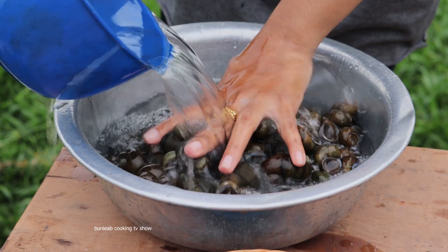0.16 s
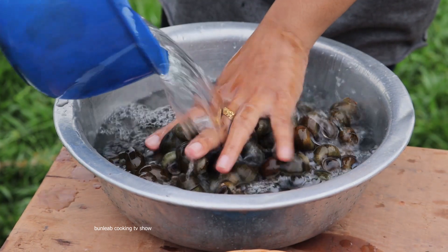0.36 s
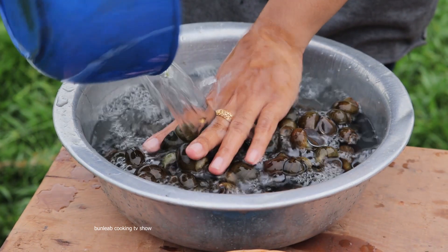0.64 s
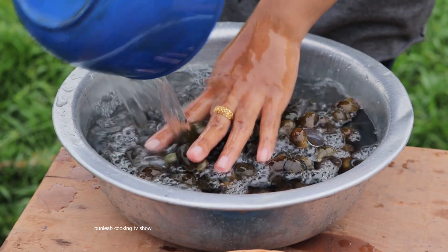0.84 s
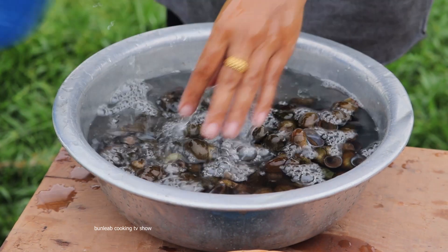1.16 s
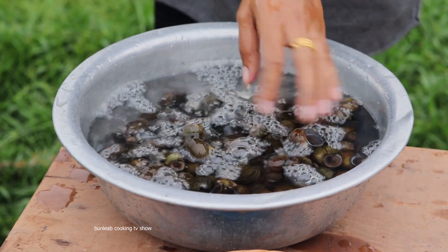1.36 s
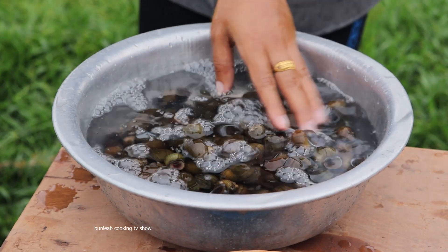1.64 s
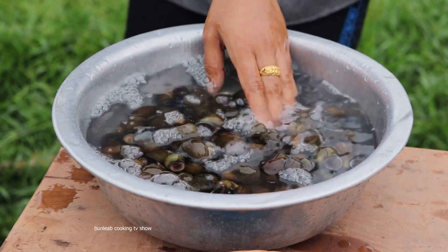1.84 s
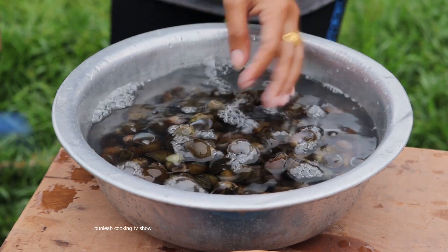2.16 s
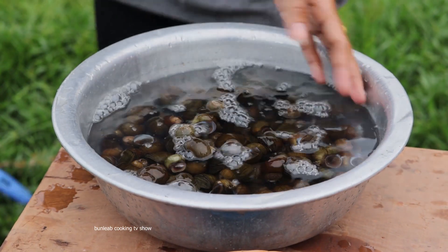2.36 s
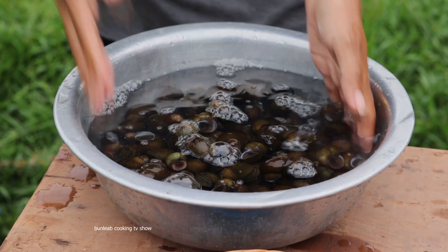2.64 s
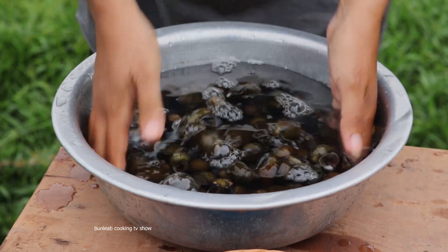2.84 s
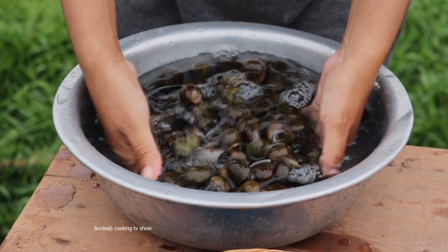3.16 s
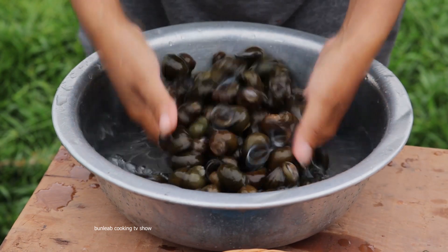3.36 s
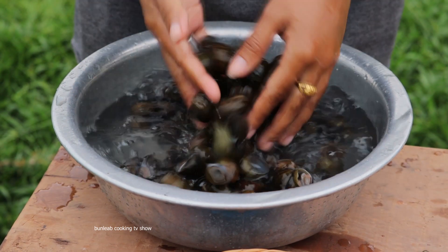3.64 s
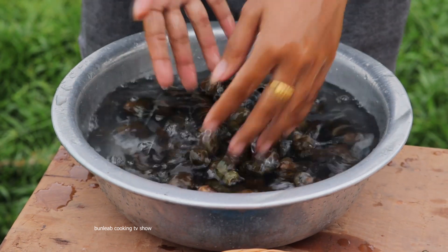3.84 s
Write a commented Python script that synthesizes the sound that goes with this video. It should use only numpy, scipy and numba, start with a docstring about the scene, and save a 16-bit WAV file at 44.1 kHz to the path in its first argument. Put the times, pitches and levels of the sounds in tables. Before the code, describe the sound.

Snail shells click and clatter quietly as water pours and gurgles into a metal basin, nearly stopping around 1.4 s. Stirring brings wet clacks and a bubble near 1.8 s, a dull basin knock at 2.3 s and faint rim rubbing. From 2.9 s to nearly 4 s, scooped shells rattle loudly and densely with bright clacks. An echoing bird repeats falling chirps until 2.7 s over faint rumble and insects.

```python
"""Throughout: distant rumble and air, and two high insect bands (shaped noise). Until about 2.7 s a bird (swept
sine) repeats a falling chirp with an echo. From the start water is poured over snails in a metal basin outdoors:
shells clatter, water gurgles and sprays (swarms of decaying sines), nearly stopping around 1.4 s. A hand stirs
them, knocks the basin at 2.3 s (damped wall modes) and rubs the rim. From about 2.9 s both hands scoop and drop
the shells, which clatter densely, with single clacks, some bright and high."""
import sys
import numpy as np
from scipy import signal
from scipy.fft import rfft, irfft
from scipy.io import wavfile
from scipy.ndimage import uniform_filter1d
from numba import njit

SR = 44100
rng = np.random.default_rng(int(sys.argv[2]) if len(sys.argv) > 2 else 0)


def int16_out(signal):
    """Quantize to a 16-bit WAV file."""
    q = np.round(np.clip(np.atleast_2d(signal).T, -1, 1) * 32767)
    wavfile.write(sys.argv[1], SR, q.astype(np.int16))


N = 176400

# Rumble and air, spectral density: f/Hz, level/dB
AIR_COLOUR = [(18, -60), (30, -16), (50, -13), (86, -2.5), (181, -5), (300, -14.5), (432, -19), (800, -20),
              (1750, -30.5), (2700, -31), (5900, -33), (8300, -28.5), (12700, -30), (15500, -42),
              (16500, -63)]
# Insect bands: centre f/Hz, Gaussian width/Hz, level/dB before flicker
INSECT_BANDS = [(11000, 540, -48), (6950, 410, -54)]
# Bird chirps: t/s, level/dB
CHIRP_TIMES = [(0.162, -34.5), (0.514, -34), (.881, -33.5), (1.23, -33.5), (1.565, -33.5), (1.927, -34),
               (2.294, -34), (2.647, -33)]
# Chirp loudness along its glide: f/Hz, level/dB
SYRINX_COLOUR = [(1950, -20), (2250, -13), (2600, -12), (2950, -4), (3300, -9), (4000, -9), (4500, -6),
                 (4950, -1), (5350, -4), (5700, -1), (6200, -8)]
# Rim modes: f/Hz, level/dB, t60/s
RIM_MODES = [(484, 0, .55), (648, -9, .25)]
# Soft low thuds: t/s, level/dB, f/Hz
LOW_THUDS = [(.97, -34, 42.3), (3.5, -38, 45)]
# Large bubbles whistling upward: t/s, level/dB, start f/Hz, decay/cycles, relative pitch rise per cycle
BIG_BUBBLES = [(1.828, -18, 1100, 130, .034), (3.645, -13, 900, 50, .035)]
# Sharp ticks: t/s, level/dB, left-right/dB
SHARP_TICKS = [(0.1433, -22, 5), (0.422, -30, -4), (0.6687, -18, 2.5), (0.7447, -24, -2), (0.821, -26.5, 2),
               (0.9968, -20, -13), (2.3719, -18.5, -18), (2.5182, -14.5, -11.5), (2.5615, -25, -10)]
# Partials of a tick: f/Hz, level/dB, t60/s
TICK_MODES = [(2130, 2.5, 0.0072), (4500, -24, 0.0022), (7600, -8, 0.0013), (11600, 17, 0.0012),
              (15200, 4, 0.003)]
# Knocks on the basin wall: t/s, level/dB, left-right/dB, loudest note f/Hz
WALL_KNOCKS = [(2.264, -16, 4.5, 1300), (2.269, -18, 4.5, 870), (2.303, -3.5, 4.5, 880),
               (2.312, -17.5, 7, 1210), (2.451, -16, 6, 826)]
# Damped basin wall modes: f/Hz, level/dB, t60/s
WALL_MODES = [(263, -10.5, 0.014), (365, 1, 0.01), (480, -7, 0.045), (588, -7.5, 0.035), (766, 5, 0.0068),
              (874, -0.5, 0.039), (1074, -9, 0.038), (1380, -1.5, 0.0084), (1500, -0.5, 0.026),
              (1980, -9, 0.019), (2500, -8, 0.017), (3100, -1.5, 0.013), (3980, -1, .006)]
# Activity in the basin, before layer gains: t/s, shell clatter level/dB, gurgle level/dB, spray level/dB
BASIN_ACTIVITY = [(0.0, -35.5, -40, -53), (0.04, -37, -42.5, -45), (0.22, -40.5, -36.5, -49.5),
                  (0.46, -36, -37.5, -47.5), (0.81, -42.5, -42, -52.5), (0.85, -43.5, -47, -59.5),
                  (0.97, -39.5, -43, -51.5), (1.05, -38, -48, -41.5), (1.21, -54.5, -42, -71),
                  (1.37, -85, -73, -73), (1.64, -41.5, -43.5, -68), (1.76, -34.5, -30, -46.5),
                  (1.8, -35.5, -35, -56), (1.92, -44, -37, -72), (2.0, -41.5, -41.5, -52),
                  (2.1, -41.5, -42.5, -63), (2.32, -55, -40.5, -69), (2.4, -46, -42, -62),
                  (2.5, -51.5, -40.5, -70), (2.6, -53, -39.5, -81), (2.7, -38.5, -35, -60),
                  (2.75, -39, -34.5, -60), (2.87, -23.5, -28.5, -43.5), (3.04, -20.5, -30.5, -38.5),
                  (3.06, -21.5, -29, -37.5), (3.22, -23.5, -29, -44), (3.31, -20, -24.5, -32),
                  (3.33, -28, -33, -51), (3.35, -26.5, -36, -34.5), (3.41, -25, -29.5, -38.5),
                  (3.52, -24, -26.5, -36), (3.54, -17.5, -27.5, -30), (3.62, -23, -33, -37),
                  (3.74, -21.5, -24, -33.5), (3.82, -22.5, -29, -31.5), (3.91, -27.5, -39.5, -43),
                  (4.0, -41, -43, -68)]
# Bursting droplets: f/Hz, level/dB
SPRAY_COLOUR = [(4000, 7), (6000, 2), (8500, 1), (12000, -7), (15500, 0)]
# Gurgling bubbles: f/Hz, level/dB
GURGLE_COLOUR = [(220, -12), (350, -12.5), (500, -3.5), (800, -6.5), (1300, -10.5), (1800, -34)]
# Bright high clacks of shells: t/s, level/dB, f/Hz, left-right/dB
HIGH_CLACKS = [(0.0174, -27, 5180, 0), (0.2967, -25, 4300, 2), (0.6097, -10, 6260, -0.5),
               (1.004, -15, 4760, 1.5), (1.041, -9, 4550, 2.5), (1.053, -11, 4400, 4),
               (1.0627, -15, 6900, 7), (1.0765, -9, 4900, 2), (1.0914, -13, 4500, 1.0),
               (1.4965, -38, 6950, 3), (1.813, -16, 4560, -0.5), (2.0922, -15.5, 4500, 1),
               (3.5384, -3, 4730, -1), (3.5843, 1, 4620, 2), (3.7117, 2, 5800, 0.5),
               (3.7814, -17, 4830, 0.5), (3.865, -5.5, 4940, 1.0)]
# Loudest shell clacks: t/s, level/dB, main ring f/Hz, left-right/dB
SHELL_CLACKS = [(0.056, -25, 2440, 0), (0.073, -24, 1310, 1.5), (0.097, -24.5, 743, 3),
                (0.112, -18, 1810, -1), (0.172, -25, 2650, 0), (0.188, -13, 1500, 6),
                (0.195, -11, 2720, -3), (0.233, -22, 760, 4), (0.276, -21, 1440, 3), (0.31, -22, 1660, 3.5),
                (0.327, -24, 713, 3), (0.531, -17, 2260, 1), (0.552, -21, 2950, -2),
                (0.583, -17.5, 1516, 4), (0.625, -13, 2520, -1), (0.635, -22, 1570, 1),
                (0.82, -19.5, 3140, 2), (0.881, -19, 2800, 0), (0.91, -15.5, 2080, -0.5),
                (0.984, -23.5, 1440, 1.5), (1, -20.5, 1590, 4), (1.025, -13.5, 2350, -2),
                (1.039, -21, 1500, 0), (1.118, -23.5, 1470, 2), (1.224, -24, 2020, -1),
                (1.579, -18.5, 2560, 2), (1.703, -24, 2500, -8), (1.721, -8, 2830, 0),
                (1.733, -12, 2950, 1), (1.769, -11, 2710, -1.0), (1.814, -16.5, 2300, 0.0),
                (1.904, -22, 2480, 1), (2.092, -21.5, 2700, 0.0), (2.125, -21.5, 2360, 1),
                (2.37, -21, 2440, 2), (2.518, -26, 2030, -11), (2.561, -26, 2350, -15),
                (2.641, -13, 2790, -2), (2.78, -14, 2580, 0), (2.802, -15.5, 2400, -1.5),
                (2.96, -5, 2530, 1), (3.03, -3.5, 2690, 1), (3.062, -2.5, 2910, 1), (3.124, -10, 2410, -7),
                (3.299, -5, 2280, -0.5), (3.351, -12, 2280, 2), (3.376, -7, 2320, -1),
                (3.45, -4, 2440, -0.5), (3.522, -14, 2720, -2), (3.537, -17, 2380, -2),
                (3.68, -3.5, 2170, 1), (3.71, -25, 2620, -8), (3.752, 1, 2440, -4), (3.773, -3.5, 2490, 2),
                (3.826, -1.5, 2620, -4), (3.838, -7, 2740, 3)]
# Partials of a clack: pitch ratio, level/dB, decay/cycles
CLACK_PARTIALS = [(0.978, 2.5, 27.7), (0.672, -2.5, 12), (1.42, -5.5, 49), (2.07, 4, 5.7), (2.3, 6, 8)]
# Hollow note of the shells: f/Hz, level/dB
HOLLOW_COLOUR = [(1900, -8), (2300, 0), (2600, -1), (2900, 0), (3300, -9)]
# Broad shell clatter: f/Hz, level/dB
SHELL_COLOUR = [(530, -16), (900, -19), (1030, -9), (1240, -11.5), (1560, -6.5), (1720, -7.5), (2360, -5.5),
                (2860, -10.5), (3530, -6.5), (4630, -16), (9000, -54), (11700, -55), (19800, -120)]
# Gain of the broad clatter, lower while shells are pushed under water: t/s, level/dB
SUNK_GAIN = [(2.6, 1), (2.8, -6), (3.25, -3.5), (3.45, 1.5)]

CLATTER, GURGLING, SPRAYING = 1, 2, 3  # columns of BASIN_ACTIVITY
AIR_MID_DB, AIR_WIDE_HZ = -43.5, 4900
INSECT_FLICKER_DB = 1.2
CHIRP_TOP_HZ, CHIRP_FLOOR_HZ, CHIRP_FALL_S = 6030, 1804, 0.039  # glide decays towards the floor
CHIRP_LEN_S, CHIRP_EDGE_S, CHIRP_ROUGH_DB, BIRD_PAN_DB = 0.092, 0.0054, 1.5, -3
TREES_T60_S, TREES_DB = 0.42, 4
ECHO_S, ECHO_DB, ECHO_TOP_HZ = 0.052, -4.5, 4200
RUB_FROM_S, RUB_TO_S, RUB_SLIP_DB = 2.37, 2.9, -42
KNOCK_FALL_DB = 3  # per octave squared from the loudest note
WALL_BUMP_DB = -6.5  # re clatter activity
CLACK_RUN_S, REBOUND_DB = 0.007, -4
SOFT_CYCLES, SPREAD_S = 0.24, 0.003  # swell of a wet contact; largest start offset of its pitches
WIDE_HZ, LEFT_LEADS_S = 14800, 2.8e-5  # random phase spread grows up to WIDE_HZ
TOP_HZ = 16100


def undb(db):
    """Amplitude gain of a dB value."""
    return 10 ** (np.asarray(db) / 20)


def colour(table, hz):
    """Level in dB at hz, interpolated over log frequency."""
    f, db = np.array(table, float).T
    return np.interp(np.log(hz), np.log(f), db)


def activity(t, column):
    """Level in dB of one basin activity column at t."""
    table = np.array(BASIN_ACTIVITY)
    return np.interp(t, table[:, 0], table[:, column])


def flutter(count, size):
    """Twice-smoothed noise of unit deviation."""
    x = uniform_filter1d(uniform_filter1d(rng.standard_normal(count), size=size), size=size)
    return x / x.std()


@njit
def ring(start, hz, fade, swell, glide, left, right, size):
    """Sum of swelling, decaying, gliding sines, cut at -40 dB, with a complex weight per channel."""
    out = np.zeros((2, size))
    for k in range(len(start)):
        i = start[k]
        z = 1. + 0j
        step = fade[k] * np.exp(2j * np.pi * hz[k] / SR)
        bend = np.exp(1j * glide[k])
        level, unswollen = 1., 1.
        while level > .01 and i < size:
            out[0, i] += (1 - unswollen) * (z * left[k]).imag
            out[1, i] += (1 - unswollen) * (z * right[k]).imag
            z = z * step
            step = step * bend
            level = level * fade[k]
            unswollen = unswollen * swell[k]
            i += 1
    return out


def grains(t, hz, cycles, db, pan_db, rise=0., soft=0.13):
    """Rings decaying 60 dB per `cycles`, swelling over `soft` cycles, rising by `rise` per cycle."""
    t, hz, cycles, db, pan_db = (np.ravel(v) * 1. for v in np.broadcast_arrays(t, hz, cycles, db, pan_db))
    hz = np.clip(hz, 20, .4 * SR)
    chance = rng.standard_normal((2, len(t)))
    turn = chance[0] * np.pi * np.minimum(hz / WIDE_HZ, 1) / 2 + np.pi * hz * LEFT_LEADS_S
    sign = np.sign(chance[1])
    w = 2 * np.pi * hz / SR
    fade = np.exp(-np.log(1000) * hz / cycles / SR)
    swell = np.exp(-hz / soft / SR)
    glide = rise * w * w / (2 * np.pi)
    left = sign * undb(db + pan_db / 2) * np.exp(1j * turn)
    right = sign * undb(db - pan_db / 2) * np.exp(-1j * turn)
    return ring((t * SR).astype(np.int64), hz, fade, swell, glide, left, right, N)


def struck(rows, modes):
    """Every blow excites the same modes, with a random balance."""
    t, db, pan = np.array(rows).T[:, :, None]
    hz, mode_db, t60 = np.array(modes).T
    balance_db = 1.5 * rng.standard_normal((len(t), len(hz)))
    return grains(t, hz, hz * t60, db + mode_db - 6 + balance_db, pan)


def swarm(column, table, cycles, scatter_db, gain_db, count, size, rise=0.):
    """Random contacts, each ringing `size` pitches; their summed level follows one activity column."""
    chance = rng.random((count, 3 + 3 * size))
    pitch, length, late = chance[:, 3::3], chance[:, 4::3], chance[:, 5::3]
    lowest, highest = table[0][0], table[-1][0]
    hz = lowest * (highest / lowest) ** pitch
    # 10 log10(hz) offsets the shorter rings of high pitches
    db = colour(table, hz) + 10 * np.log10(hz) - scatter_db * np.log(chance[:, 1:2] + 0.0039)
    t = chance[:, :1] * N / SR + SPREAD_S * late
    pan_db = 5 * (chance[:, 2:3] - .5)
    x = grains(t, hz, cycles * (.5 + length), db, pan_db, rise, SOFT_CYCLES)
    return x / np.sqrt(np.mean(x ** 2)) * undb(gain_db + activity(np.arange(N) / SR, column))


def air():
    """Rumble and air: coloured noise, narrow in the bass, wide in the treble."""
    hz = np.maximum(np.arange(N // 2 + 1) * SR / N, 10)
    mid, side = rfft(rng.standard_normal((2, N))) * undb(colour(AIR_COLOUR, hz))
    side = side * np.clip(hz / AIR_WIDE_HZ, .09, 1)
    mid_rms = np.sqrt(np.mean(irfft(mid, N) ** 2))
    return irfft(np.array([mid + side, mid - side]), N) * undb(AIR_MID_DB) / mid_rms


def insects():
    """Two Gaussian bands of noise that flicker quickly, partly shared by the channels."""
    hz = np.arange(N // 2 + 1) * SR / N
    out = np.zeros((2, N))
    for centre_hz, width_hz, db in INSECT_BANDS:
        noise = rng.standard_normal((3, N))
        band = np.exp(-.5 * ((hz - centre_hz) / width_hz) ** 2)
        hiss = irfft(rfft(0.41 * noise[0] + noise[1:]) * band, N)
        out += hiss / hiss.std() * undb(db + INSECT_FLICKER_DB * flutter(N, 300))
    return out


def chirp():
    """Whistle gliding down exponentially, its loudness set by pitch and roughened."""
    t = np.arange(int(CHIRP_LEN_S * SR)) / SR
    hz = CHIRP_FLOOR_HZ + (CHIRP_TOP_HZ - CHIRP_FLOOR_HZ) * np.exp(-t / CHIRP_FALL_S)
    edge = np.minimum(np.minimum(t, CHIRP_LEN_S - t) / CHIRP_EDGE_S, 1)
    level = undb(colour(SYRINX_COLOUR, hz) + CHIRP_ROUGH_DB * flutter(len(t), 80))
    return np.sqrt(2) * edge * level * np.sin(2 * np.pi * np.cumsum(hz) / SR)


def trees():
    """Impulse response: direct sound, decaying diffuse tail from the trees, one clear echo."""
    t = np.arange(SR // 2) / SR
    noise = rng.standard_normal((3, len(t)))
    tail = (noise[0] + 1.5 * noise[1:]) * 1000 ** (-t / TREES_T60_S)
    tail = signal.sosfilt(signal.butter(1, ECHO_TOP_HZ, fs=SR, output="sos"), tail)
    tail *= undb(TREES_DB) / np.sqrt(np.sum(tail ** 2, axis=1, keepdims=True))
    tail[:, 0] = 1  # direct sound
    echo = 1. * (np.arange(len(t)) == int(ECHO_S * SR))
    echo = signal.sosfilt(signal.butter(8, ECHO_TOP_HZ, fs=SR, output="sos"), echo)
    return tail + undb(ECHO_DB) * echo


def bird():
    """The chirp at each call time, convolved with the trees' response."""
    starts = np.zeros(N)
    for t, db in CHIRP_TIMES:
        starts[int(t * SR)] = undb(db)
    calls = signal.fftconvolve(starts, chirp())[None, :N]
    pan = undb(np.array([[BIRD_PAN_DB], [-BIRD_PAN_DB]]) / 2)
    return signal.fftconvolve(calls, trees(), axes=1)[:, :N] * pan


def thuds():
    """Soft low thuds: slowly swelling, damped bass sines."""
    t, db, hz = np.array(LOW_THUDS).T
    return grains(t, hz, 19, db, 0, soft=1.5)


def rim():
    """A hand slides along the rim: many faint slips keep its modes humming unevenly."""
    t = RUB_FROM_S + (RUB_TO_S - RUB_FROM_S) * rng.random(40)
    slips = np.array([t, RUB_SLIP_DB + 0 * t, 4.4 + 0 * t]).T
    return struck(slips, RIM_MODES)


def knocks():
    """Each knock rings the wall modes, most strongly around its own note."""
    t, db, pan, note_hz = np.array(WALL_KNOCKS).T[:, :, None]
    hz, mode_db, t60 = np.array(WALL_MODES).T
    fall_db = KNOCK_FALL_DB * np.log2(hz / note_hz) ** 2
    return grains(t, hz, hz * t60, db + mode_db - 6 - fall_db, pan, soft=0.48)


def gloops():
    """Large bubbles: slowly swelling sines whose pitch rises."""
    t, db, hz, cycles, rise = np.array(BIG_BUBBLES).T
    return grains(t, hz, cycles, db, 0, rise, soft=17.0)


def spray():
    """Bursting droplets: a swarm of high rings."""
    return swarm(SPRAYING, SPRAY_COLOUR, cycles=64, scatter_db=3.5, gain_db=10, count=6000, size=4)


def gurgle():
    """Bubbles: a swarm of low rings rising in pitch."""
    return swarm(GURGLING, GURGLE_COLOUR, cycles=45, scatter_db=1.5, gain_db=-6.5,
                 count=1200, size=1, rise=0.0076)


def ticks():
    """Sharp ticks: very short bright modes."""
    return struck(SHARP_TICKS, TICK_MODES)


def wall_bumps():
    """Shells bump the wall at random and ring its modes, following the clatter activity."""
    chance = rng.random((2, 120))
    t = chance[0] * N / SR
    db = activity(t, CLATTER) + WALL_BUMP_DB - 3 * np.log(chance[1] + 0.042)
    return struck(np.array([t, db, 0 * t]).T, WALL_MODES)


def high_clacks():
    """Bright high clacks of shells: short high rings."""
    t, db, hz, pan = np.array(HIGH_CLACKS).T
    return grains(t, hz, 36, db + 0.5, pan, soft=3.0)


def clacks():
    """Single loud shell hits: each a quick run of four contacts ringing detuned partials."""
    t, db, hz, pan = np.array(SHELL_CLACKS).T[:, :, None, None]
    ratio, part_db, cycles = np.array(CLACK_PARTIALS).T
    rebound = np.arange(4)[:, None] > 0
    chance = rng.random((len(t), 4, 1 + len(ratio)))
    detune = 1 + 0.31 * (chance[..., 1:] - .5) * (np.arange(len(ratio)) > 0)  # first partial stays put
    contact_t = t + rebound * CLACK_RUN_S * chance[..., :1]
    contact_db = db + part_db - 6.5 + rebound * REBOUND_DB
    return grains(contact_t, hz * ratio * detune, cycles, contact_db, pan, soft=0.35)


def clatter():
    """Dense shell contacts: a broad swarm, quieter under water, and a swarm on the hollow note."""
    sunk = undb(np.interp(np.arange(N) / SR, *np.array(SUNK_GAIN).T))
    broad = swarm(CLATTER, SHELL_COLOUR, cycles=57, scatter_db=3.5, gain_db=-1, count=6000, size=5)
    hollow = swarm(CLATTER, HOLLOW_COLOUR, cycles=36, scatter_db=2.5, gain_db=0, count=8000, size=2)
    return broad * sunk + hollow


def scene():
    """Sum of all sources, background first."""
    background = air() + insects() + bird()
    basin = thuds() + rim() + knocks()
    water = gloops() + spray() + gurgle()
    shells = ticks() + wall_bumps() + high_clacks() + clacks() + clatter()
    return background + basin + water + shells


def record(dry):
    """The microphone drops the deepest bass; the recorder cuts the top."""
    dry = signal.sosfilt(signal.butter(2, 30, "high", fs=SR, output="sos"), dry)
    return signal.sosfilt(signal.ellip(10, .2, 90, TOP_HZ, fs=SR, output="sos"), dry)


dry = scene()
out = record(dry)
int16_out(out)
```